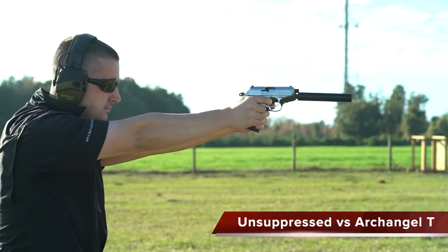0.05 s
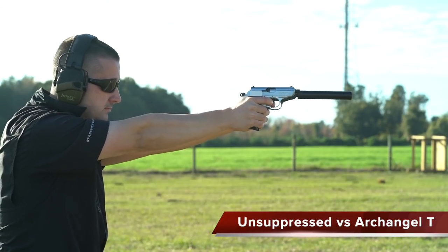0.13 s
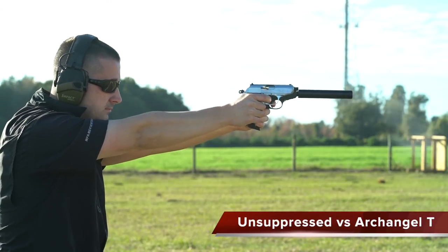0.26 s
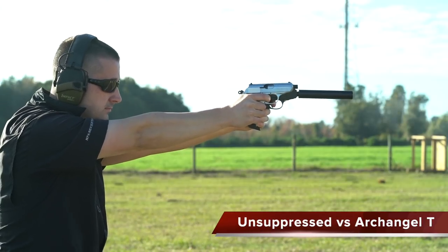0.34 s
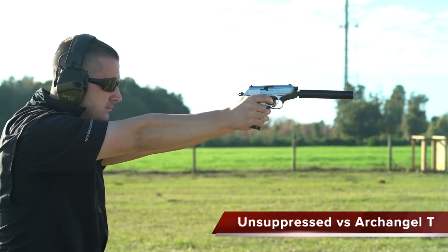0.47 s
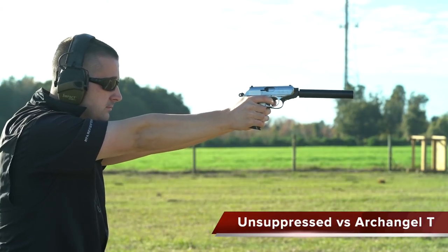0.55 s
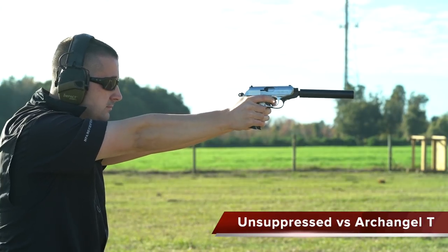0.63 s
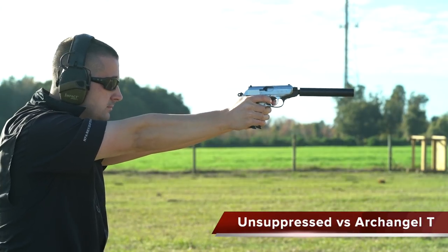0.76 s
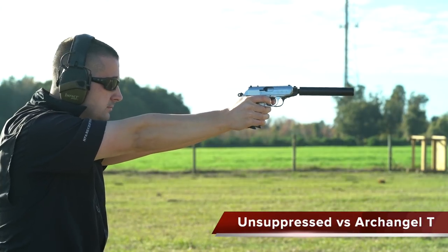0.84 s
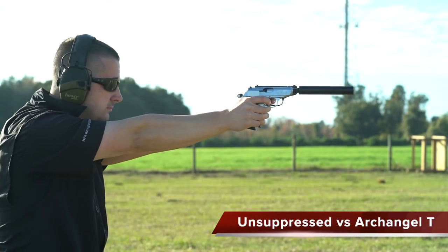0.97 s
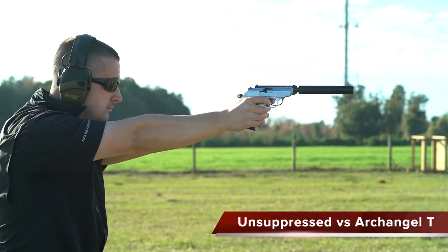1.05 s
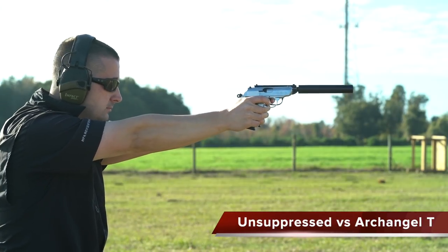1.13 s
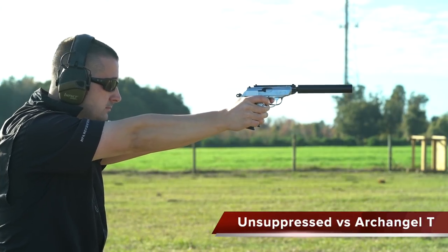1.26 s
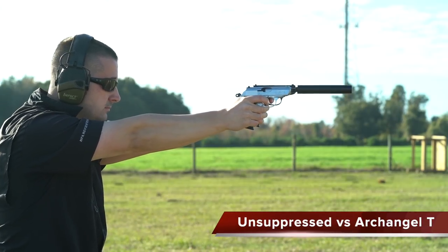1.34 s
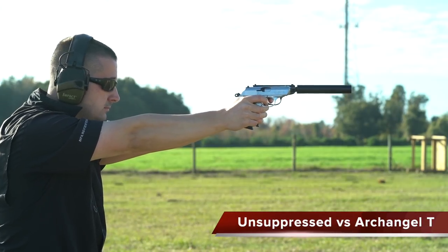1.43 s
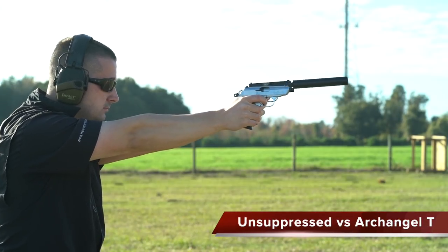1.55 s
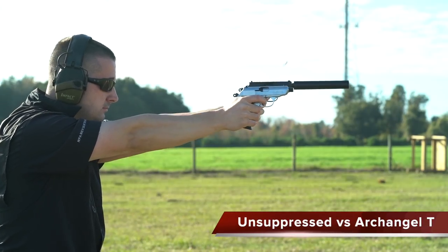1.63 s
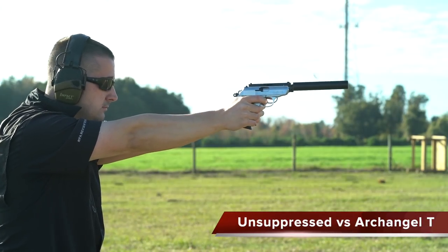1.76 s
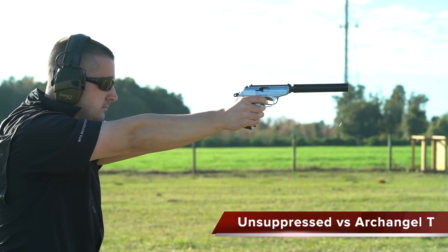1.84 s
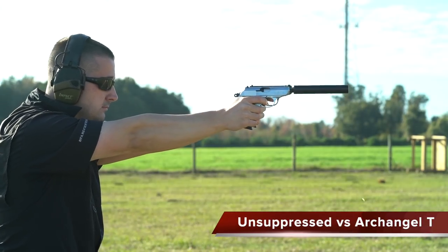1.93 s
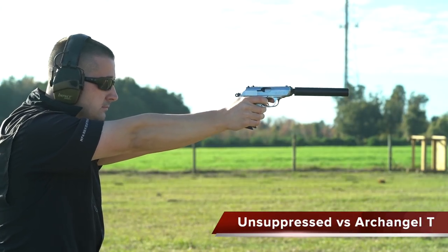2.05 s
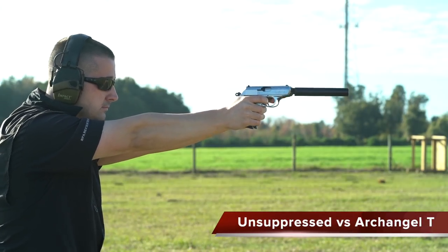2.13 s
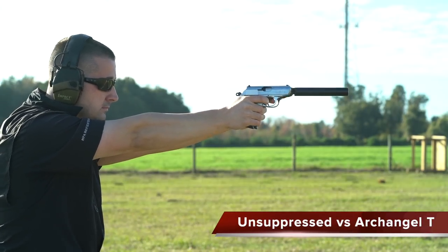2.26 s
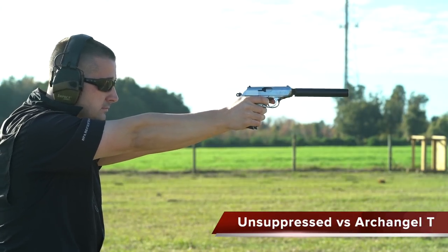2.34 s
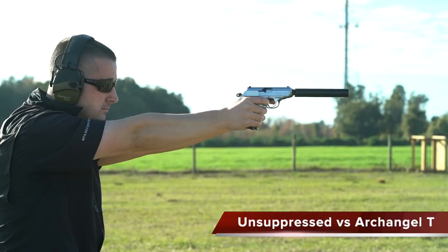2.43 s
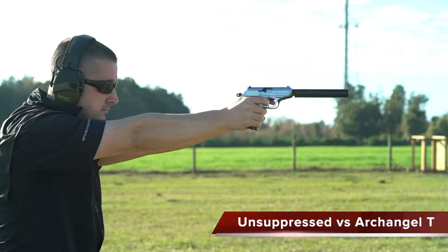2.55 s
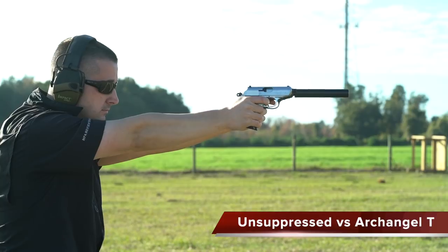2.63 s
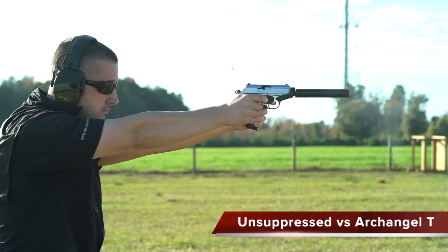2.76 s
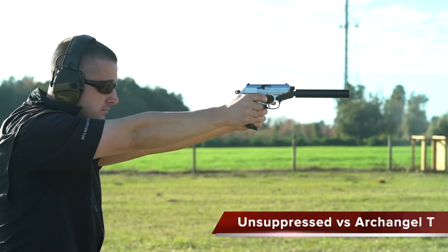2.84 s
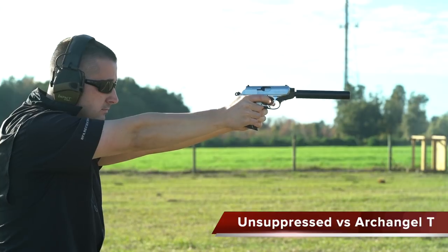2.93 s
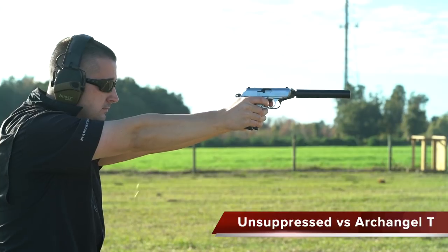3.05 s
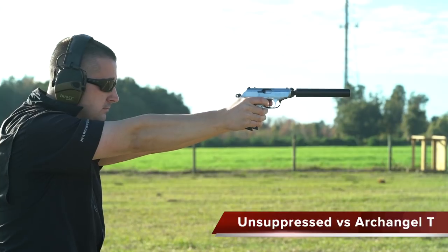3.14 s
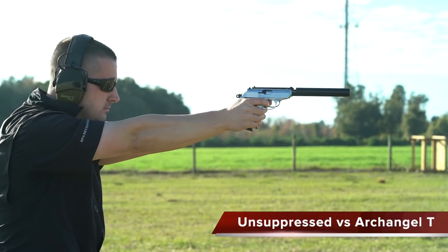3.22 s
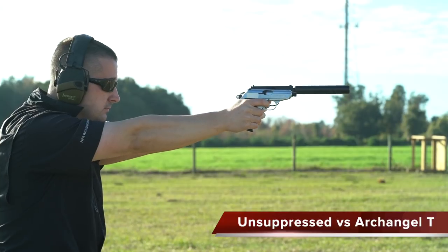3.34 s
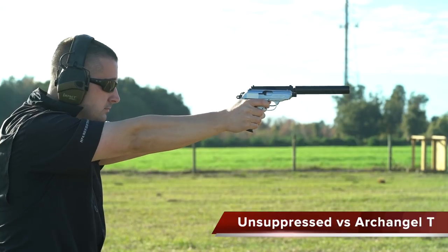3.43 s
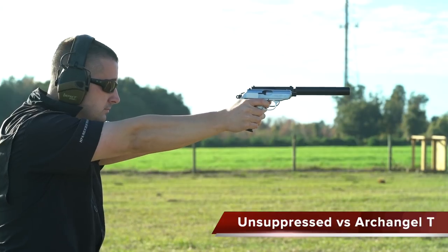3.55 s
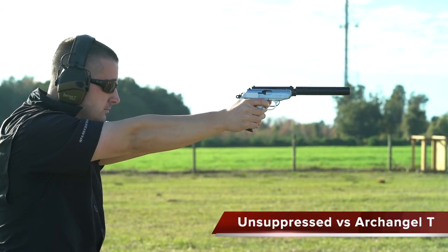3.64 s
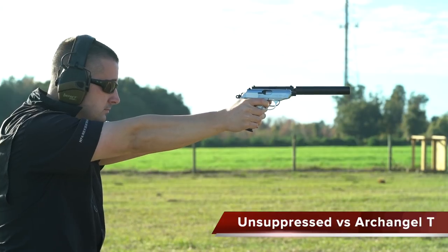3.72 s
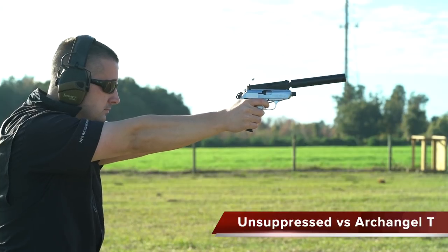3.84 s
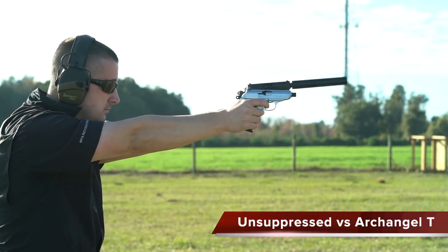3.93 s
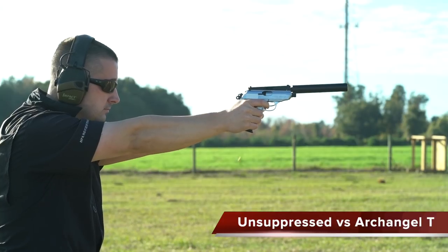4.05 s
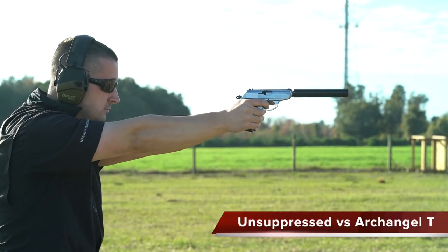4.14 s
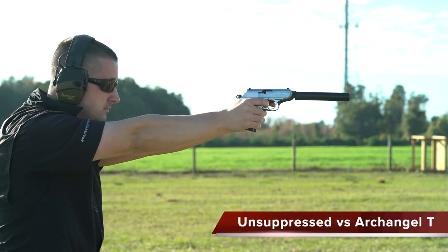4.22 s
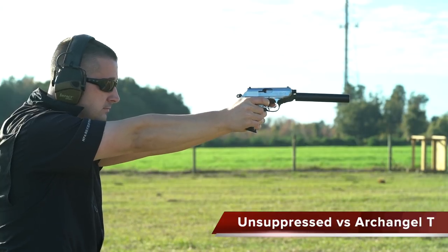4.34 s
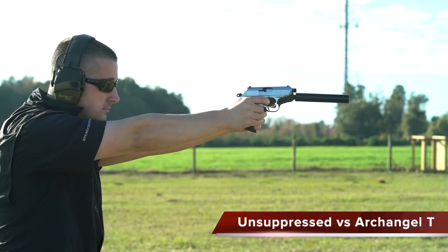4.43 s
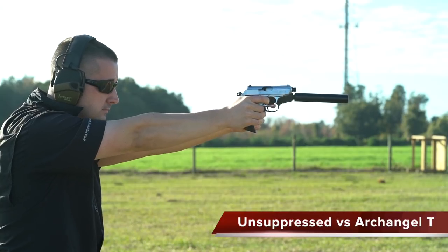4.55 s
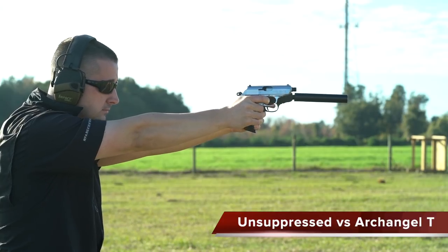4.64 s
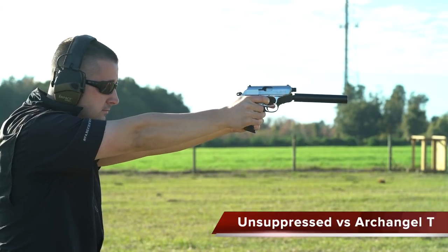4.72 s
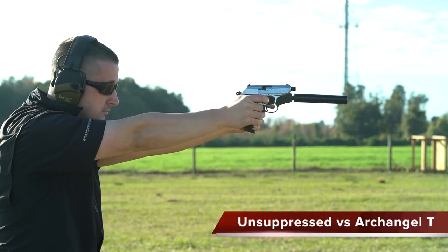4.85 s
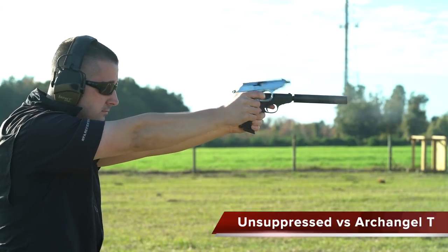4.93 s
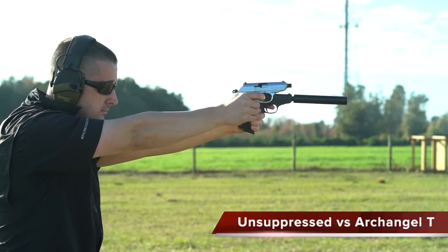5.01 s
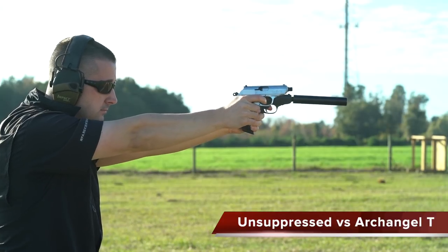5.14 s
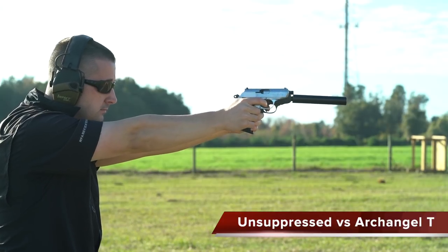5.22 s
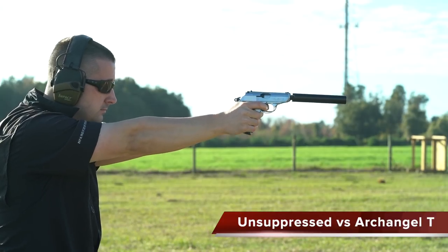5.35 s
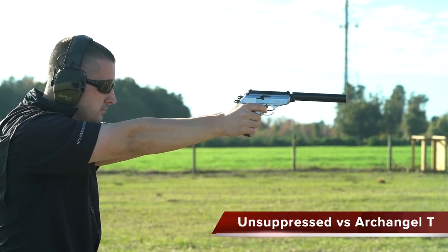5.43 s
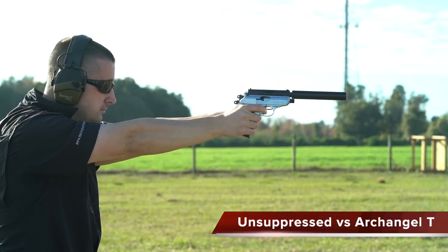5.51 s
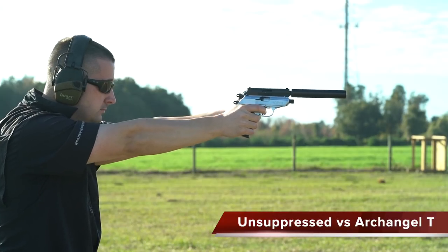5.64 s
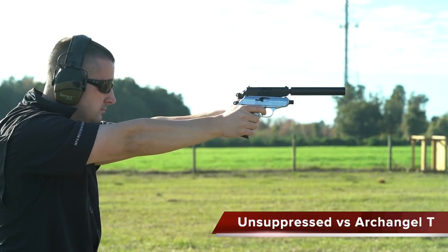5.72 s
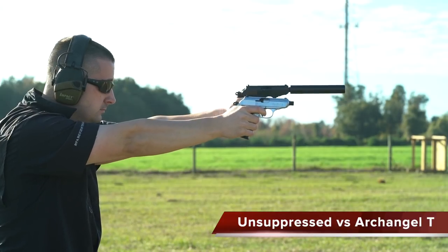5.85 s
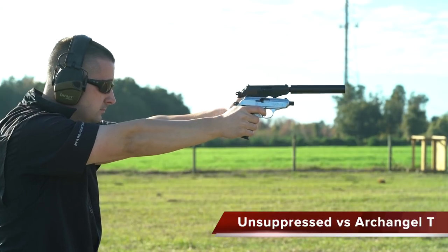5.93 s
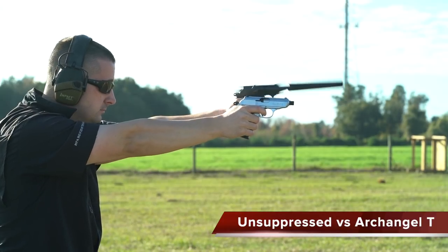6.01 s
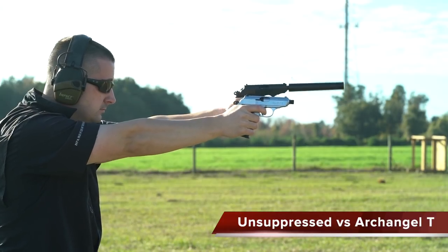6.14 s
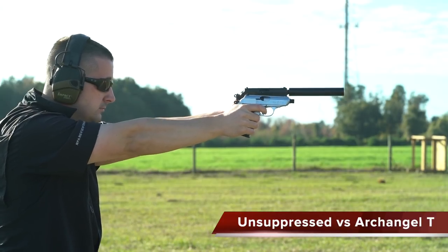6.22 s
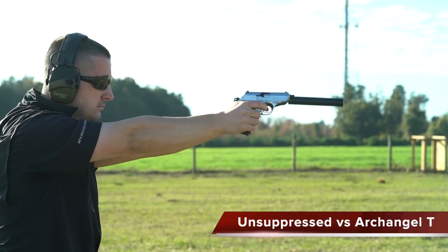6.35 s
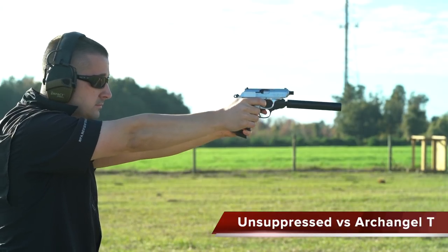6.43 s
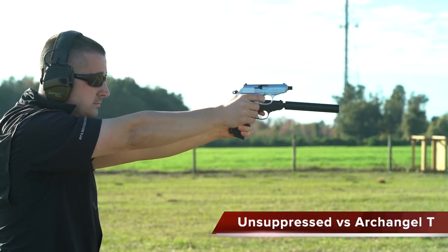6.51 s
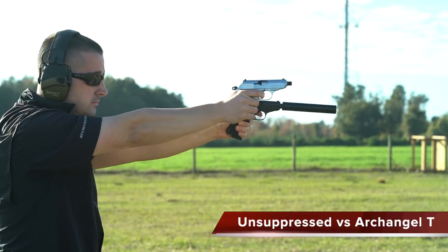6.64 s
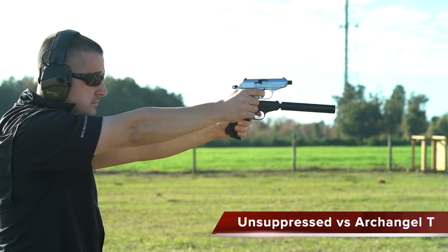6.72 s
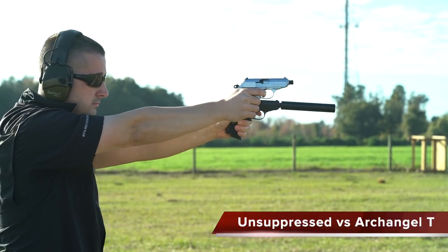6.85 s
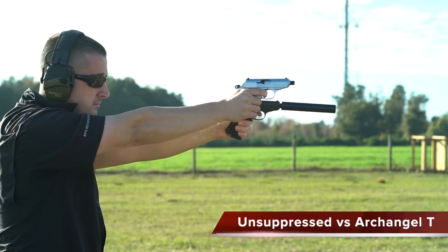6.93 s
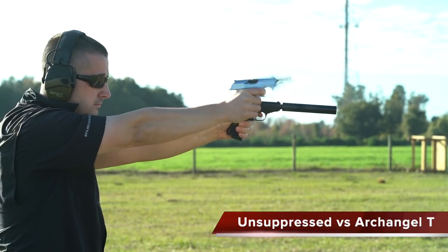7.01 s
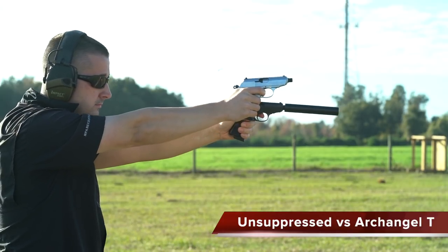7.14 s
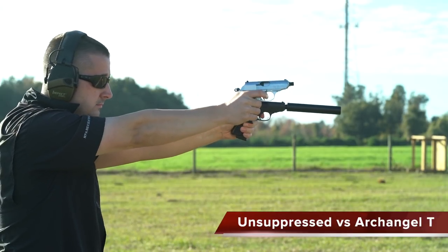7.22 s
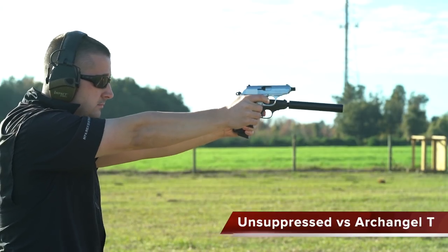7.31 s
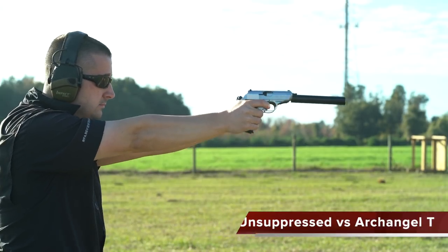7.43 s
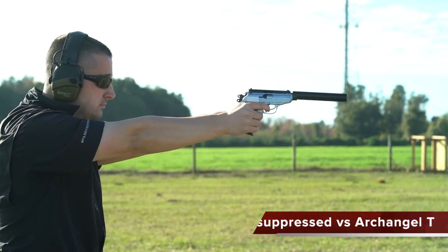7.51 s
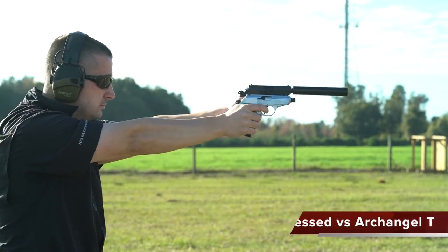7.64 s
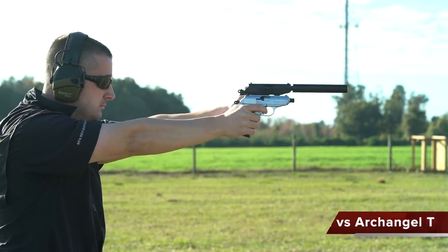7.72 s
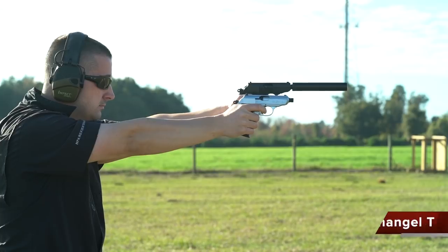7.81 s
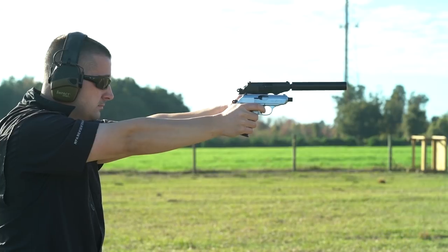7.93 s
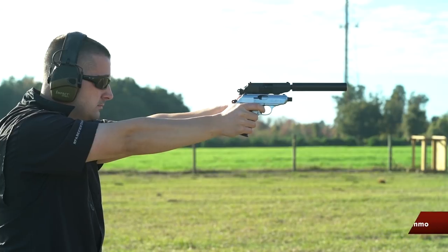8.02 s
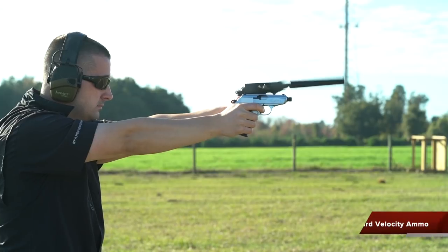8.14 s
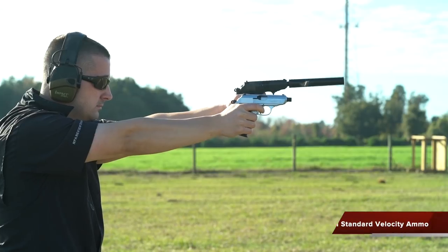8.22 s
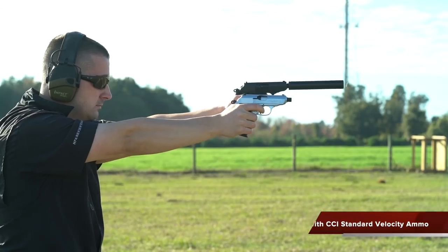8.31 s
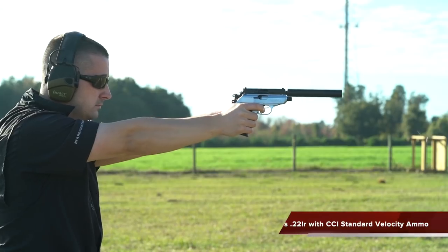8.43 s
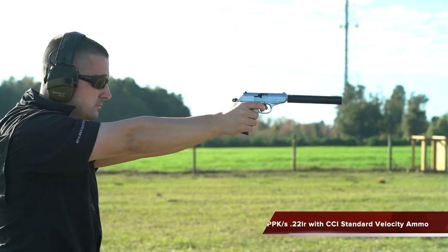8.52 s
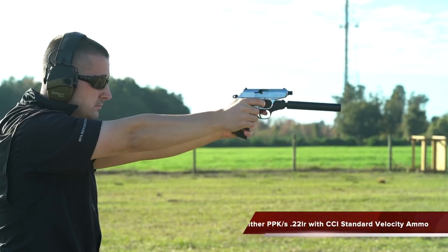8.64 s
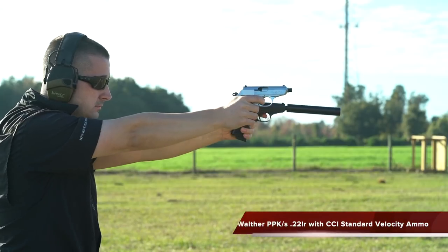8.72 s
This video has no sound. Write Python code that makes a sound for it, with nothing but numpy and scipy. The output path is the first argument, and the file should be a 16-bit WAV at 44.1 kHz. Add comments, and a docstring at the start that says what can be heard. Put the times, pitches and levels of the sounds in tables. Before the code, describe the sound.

Heard close up outdoors, a loud, slightly distorted pistol crack alternates with a quieter, puffing snap from a silenced pistol, four times each at a steady pace. Every shot carries a quick metallic clack and a short slapping echo off the surroundings, strongest after the loud ones. The silenced shots trail a thin, high bullet whir ending in a small distant tick. A very faint road hum lies underneath.

```python
"""Bare and silenced pistols on a grass range

Two small pistols fire in turn: the bare one's blast overloads the microphones, the silenced one cracks,
hisses and thumps, and a steel slide slams shut after each shot. Every shot returns from the same shelter,
bank, fence posts and far tree lines. After the quiet shots the bullet whirs away until it strikes.
Far traffic hums on the left."""
import sys
import numpy as np
from scipy import signal
from scipy.io import wavfile

SR = 44100
rng = np.random.default_rng(int(sys.argv[2]) if len(sys.argv) > 2 else 0)


def wav_record(signal):
    """Record a signal, one row per channel, as 16-bit PCM in the file named by sys.argv[1]."""
    frames = np.transpose(np.atleast_2d(signal))
    bounded = np.clip(frames, -1, 1)
    # unit amplitude maps onto the largest positive 16-bit level
    quanta = np.round(bounded * 32767).astype(np.int16)
    wavfile.write(sys.argv[1], SR, quanta)


N = 386757

# Silenced shots: start_s, crack_db, gas_db, thump_db, echo_db, echo_treble_db, late_ticks_db
SILENCED_SHOTS = [(1.5994, -5.5, -8, 3, -19.5, -7.5, -57), (3.8734, 4, -13.5, -7, -33.5, -11.5, -70),
                  (6.0923, -11.5, -13.5, -7.5, -33.5, -16, -65), (8.2152, -2, -11, -11.5, -31, -19, -60)]
# Spectrum of turbulent powder gas: frequency_hz, density_db
GAS_SPECTRUM = [(180, -27.5), (300, 0.5), (565, -4), (856, -8.5), (2360, -9.5), (6520, -3), (10000, -7.5),
                (14000, -10.5), (16000, -15)]
GROUND_ECHO_S = .0037   # lag of the ground reflection of gas puff and slide
ECHO_SAMPLES = round(1.5 * SR)


def blast():
    """Blast wave: a pressure step swings to suction and back as it dies."""
    swing_hz, decay_s = 900, .0008
    t = np.arange(400) / SR
    return np.cos(2 * np.pi * swing_hz * t) * np.exp(-t / decay_s)


def bare_shots(near, far):
    """Sudden expansion: a blast and its ground reflection, a gas jet, a low thud and the echoes."""
    # start_s, level_db
    shots = [(0.2884, 0.5), (2.786, 1), (4.9794, 0.5), (7.1006, 0.5)]
    # Damped modes of the low thud: pitch_hz, level_db, t60_s
    thud_modes = [(65, -12, 0.035), (273, -5, 0.021), (595, -8.5, 0.047), (812, -6, 0.035)]
    out, t = np.zeros((2, N)), np.arange(3000) / SR
    pulse = from_db(12) * blast()
    ground = from_db(-3.5) * pulse
    thud = ring(thud_modes, spread_db=0, size=20000)
    for start_s, level_db in shots:
        jet = decay(t, 2, t60_s=.0096) * band_noise(GAS_SPECTRUM, [(300, 1), (15000, 1)], len(t))
        arrivals = (0, pulse), (.0036, ground), (.0008, jet), (.001, thud), (0, near), (0, far)
        for delay_s, sound in arrivals:
            add(out, start_s + delay_s, from_db(level_db) * sound)
    return out


def silenced_shots(far):
    """Cavity resonance: the silencer tube thumps after a crack, amid hissing gas; the echo is bright."""
    # pitch_hz, level_db, t60_s
    tube_modes = [(266.7, -18.5, 0.025), (545, -6, 0.0078), (1122, -9.5, 0.0038)]
    out, t = np.zeros((2, N)), np.arange(9000) / SR
    far_treble = butter(far, 6000, "high", order=4)
    crack_s = .00007
    crack = butter((1 - t / crack_s) * np.exp(-t / crack_s), 300, "high")
    for start_s, crack_db, gas_db, thump_db, echo_db, treble_db, _ in SILENCED_SHOTS:
        turbulence = band_noise(GAS_SPECTRUM, [(300, 1), (15000, .49)], len(t))
        add(out, start_s, from_db(gas_db) * gas_flow(t) * turbulence)
        add(out, start_s, from_db(crack_db) * crack)
        thump = from_db(thump_db) * butter(ring(tube_modes, spread_db=1.7), 130, "high")
        add(out, start_s + .00081, thump)
        add(out, start_s + .00068 + GROUND_ECHO_S, from_db(-5) * thump)
        add(out, start_s, from_db(echo_db) * far + from_db(treble_db) * far_treble)
    return out


def gas_flow(t):
    """Pressure release at muzzle and breech: a puff, its ground reflection and a leak in two stages."""
    def puff(age_s, rise_s=.0011):
        return np.clip(age_s / rise_s, 0, 1) * decay(np.abs(age_s), 2, t60_s=.0098)
    leak = decay(t, -6, t60_s=.06) + decay(t, -33, t60_s=.18)
    return puff(t) + from_db(-5.5) * puff(t - GROUND_ECHO_S) + leak


def slide():
    """Impact of steel on steel: short-lived modes ring and small parts rattle as the slide shuts."""
    # start_s, level_db
    closings = [(0.3431, -20.5), (1.6396, -21.5), (2.8293, -23), (3.907, -22), (5.028, -21),
                (6.1267, -18.5), (7.1438, -21), (8.2475, -20)]
    # pitch_hz, level_db, t60_s
    steel_modes = [(2000, -5.5, 0.018), (2120, -4.5, 0.022), (3300, -5.5, 0.015), (4700, -2, 0.016),
                   (6000, -3.5, 0.011), (7260, 0.5, 0.014), (11700, -9, .01)]
    out, t = np.zeros((2, N)), np.arange(6000) / SR
    for start_s, level_db in closings:
        rattle = decay(t, -.5, t60_s=.022) * butter(rng.standard_normal(len(t)), 3000, "high")
        steel = from_db(-7) * butter(ring(steel_modes, spread_db=2.1), 1200, "high")
        clack = from_db(level_db) * (rattle + steel)
        add(out, start_s, clack)
        add(out, start_s + GROUND_ECHO_S, from_db(-5) * butter(clack, 2700, "low"))
    return out


def bullets():
    """Modulation: a bullet's wobble swings its whistle and pulses its wake until it strikes with a tick."""
    # strike_s, strike_db, strike_low_hz, strike_high_hz,
    # first_hz, last_hz, swing_hz, first_db, last_db, pitch_top_s, wobble_hz
    flights = [(1.8149, -33.5, 2042, 3158, 12400, 11700, 695, -51, -69, 1.33, 82.7),
               (4.0872, -29, 1240, 3658, 11260, 10830, 909.3, -49.5, -63.5, 4.18, 98),
               (6.303, -31.5, 2680, 4250, 11400, 11200, 1100, -50, -58.5, 6.9, 101.4),
               (8.4279, -30, 2167, 3520, 11150, 10500, 706.3, -49.5, -62.5, 8, 90.6)]
    out, to_right = np.zeros((2, N)), sides(-10.5)
    for (shot_s, *_), (strike_s, strike_db, low_hz, high_hz, *whir) in zip(SILENCED_SHOTS, flights):
        first_hz, last_hz, swing_hz, first_db, last_db, pitch_top_s, wobble_hz = whir
        start_s = shot_s + .033
        t = np.arange(start_s, strike_s, 1 / SR)
        progress = (t - start_s) / (strike_s - start_s)
        wobble = np.cos(2 * np.pi * wobble_hz * (t - pitch_top_s))
        pitch_noise, wake_noise = rng.standard_normal((2, 12000))[:, :len(t)]
        jitter_hz = 1200 * butter(pitch_noise, 700, "low")
        pitch_hz = first_hz + (last_hz - first_hz) * progress + swing_hz * wobble + jitter_hz
        swell = np.clip(1.6 * wobble + .9, .05, 1)   # loud at each pitch top
        whistle = swell * np.sin(2 * np.pi * np.cumsum(pitch_hz) / SR)
        wake = from_db(-4) * butter(wake_noise, [5500, 14000], "band") * (1 + .59 * wobble)
        fade = from_db(first_db + (last_db - first_db) * progress)
        add(out, start_s, fade * to_right * (whistle + wake))
        tick = ring([(low_hz, 0, .004), (high_hz, -1, .004), (8000, -5, .002)], spread_db=1, size=500)
        add(out, strike_s, from_db(strike_db) * to_right * butter(tick, 450, "high"))
    return out


def near_scatter():
    """Diffuse reflection near the firing line: a bare blast leaves a fast decay and a slower, dull one."""
    # Both spectra: frequency_hz, density_db
    fast_spectrum = [(59, -34.5), (100, -3), (266, -12), (910, -1), (1720, -1.5), (2860, -11.5),
                     (3320, -8.5), (3620, -8.5), (8460, -14.5), (16000, -21.5)]
    slow_spectrum = [(35, -45), (60, -14.5), (217, -8), (363, -2), (607, -12), (1200, -15.5), (3190, -35),
                     (14600, -32), (16000, -37)]
    # Left-right likeness: frequency_hz, correlation
    coherence = [(60, 0.44), (380, 0.5), (2380, 0.68), (15000, 0.1)]
    t = np.arange(ECHO_SAMPLES) / SR
    onset = 1 - np.exp(-(t / .0014) ** 2)
    fast = decay(t, -5, t60_s=.11) * sides(.5) * band_noise(fast_spectrum, coherence, len(t))
    slow = decay(t, -35, t60_s=.38) * sides(-1) * band_noise(slow_spectrum, coherence, len(t))
    return onset * (fast + slow)


def far_scatter():
    """Scattering: each broad reflector returns a crackling wash, dulled by air absorption on its way."""
    # Shelter, bank, scrub and tree lines:
    # delay_s, level_db, rise_s, hold_s, t60_s, tilt_db_per_octave, low_cut_hz, pan_db
    reflectors = [(0.172, -37, 0.0057, .018, 0.099, -1.5, 348, -9.5),
                  (.218, -27, .009, .001, .08, 0, 1300, 0), (0.249, -53, 0.01985, .01, .25, -2, 900, -6.5),
                  (0.297, -63.5, .03, .07, .5, 0, 706.1, -0.5),
                  (0.676, -76.5, .02, .025, .07, 2.5, 697, -0.5),
                  (.78, -68, 0.018, .003, .16, -3.5, 700, 0), (0.857, -69.5, .02, .035, 0.14, -3, 895, -2),
                  (.975, -63.5, .04, .06, 1.5, -4.5, 998.6, 1)]
    # frequency_hz, density_db
    spectrum = [(120, -21.5), (400, -14), (607, -8.5), (676, 6), (1900, 0), (2150, -5), (3810, -9),
                (7630, -14), (16000, -35)]
    # Left-right likeness: frequency_hz, correlation
    coherence = [(500, 0.87), (15000, 1)]
    rise_db, crackle_db, air_hz_at_1s = 22, 3, 3900
    out = np.zeros((2, ECHO_SAMPLES))
    for delay_s, level_db, rise_s, hold_s, t60_s, tilt_db, cut_hz, pan_db in reflectors:
        t = np.arange(-2 * rise_s, hold_s + min(t60_s, .6), 1 / SR)
        crackle = butter(rng.standard_normal(len(t)), 300, "low")
        contour_db = rise_db * np.minimum(t, 0) / rise_s - 60 * np.maximum(t - hold_s, 0) / t60_s
        envelope = from_db(level_db + contour_db + crackle_db * crackle / crackle.std())
        wash = band_noise(spectrum, coherence, len(t), tilt_db=tilt_db, cut_hz=cut_hz)
        wash = butter(wash, min(air_hz_at_1s / delay_s, .4 * SR), "low", order=4)
        add(out, delay_s + t[0], envelope * sides(pan_db) * wash)
    return out


def slap_echoes():
    """Discrete reflection: small hard objects return the blast without bass; the air absorbs treble."""
    # delay_s, level_db, pan_db
    reflectors = [(.1659, -40, -1), (.2087, -33, 2), (.2205, -24, 0), (.2262, -30, -1), (.2281, -29, 0),
                  (.2336, -28, -1), (.2619, -48, 1), (.2859, -53, -1), (.2995, -55, 6), (.309, -56, -3),
                  (.344, -51, 3), (.36, -49, 8), (.3784, -57, 5), (.3933, -52, 9), (.7855, -60, -2),
                  (.8827, -62, -2), (.8982, -62, -1), (.9181, -60, -1), (.989, -58, 0)]
    low_cut_hz, air_hz_at_1s = 1000, 3200
    out, edge = np.zeros((2, ECHO_SAMPLES)), np.diff(blast(), prepend=0)
    for delay_s, level_db, pan_db in reflectors:
        slap = butter(edge, [low_cut_hz, min(air_hz_at_1s / delay_s, .4 * SR)], "band")
        add(out, delay_s, from_db(level_db) * sides(pan_db) * slap / np.abs(slap).max())
    return out


def late_ticks():
    """Damped noise bursts: three faint, bright ticks patter from downrange after each silenced shot."""
    delay_s, gap_s = .351, .006
    out, t = np.zeros((2, N)), np.arange(400) / SR
    for shot_s, *_, level_db in SILENCED_SHOTS:
        for k in range(3):
            noise = butter(rng.standard_normal(len(t)), [2200, 8500], "band")
            start_s = shot_s + delay_s + gap_s * k * rng.uniform(.8, 1.3)
            add(out, start_s, decay(t, level_db, t60_s=.015) * noise)
    return out


def traffic():
    """Stationary noise: a far road hums over the microphones' own hiss."""
    # frequency_hz, density_db
    spectrum = [(12, -63), (20, -33), (77, -3.5), (101, 3), (255, -8), (301, -10.5), (459, -11), (660, -11),
                (738, -16), (897, -8), (2140, -37), (6180, -46), (7310, -43), (14700, -39), (16000, -46)]
    # Left-right likeness: frequency_hz, correlation
    coherence = [(60, .85), (550, .62), (2000, .6), (5000, 0)]
    # frequency_hz, pan_db
    balance = [(60, 4.5), (180, 0.5), (550, 9.5), (1650, 3.5), (4970, -2.5), (15000, -4)]
    hum = from_db(-62) * band_noise(spectrum, coherence, N, pan=balance)
    return hum + from_db(-83) * rng.standard_normal((2, N))


def from_db(db):
    """Amplitude ratio of a level."""
    return 10 ** (np.asarray(db) / 20)


def decay(t, level_db, t60_s):
    """Exponential decay: the level falls 60 dB in t60_s."""
    return from_db(level_db - 60 * t / t60_s)


def sides(pan_db):
    """Left and right gains of a level difference; positive is left."""
    return from_db(np.array([[.5], [-.5]]) * pan_db)


def at_hz(points, hz):
    """Interpolation on a log-frequency axis."""
    frequencies, values = np.array(points).T
    return np.interp(np.log(hz), np.log(frequencies), values)


def add(track, start_s, sound):
    """Superposition: a sound joins the track at start_s."""
    i = round(start_s * SR)
    track[..., i:i + sound.shape[-1]] += sound[..., :track.shape[-1] - i]


def ring(modes, spread_db, size=6000):
    """Free vibration: one blow starts damped modes, their levels varied at random by spread_db."""
    t, offsets_db = np.arange(size) / SR, rng.normal(0, spread_db, len(modes))
    return sum(decay(t, db + offset_db, t60_s) * np.sin(2 * np.pi * hz * t)
               for (hz, db, t60_s), offset_db in zip(modes, offsets_db))


def butter(x, hz, kind, order=2):
    """Causal filter with a flat passband."""
    return signal.sosfilt(signal.butter(order, hz, kind, fs=SR, output="sos"), x)


def band_noise(spectrum, coherence, size, pan=((20, 0), (20000, 0)), tilt_db=0, cut_hz=1):
    """Partly coherent stereo noise in half octaves, rms 1 before pan, tilt about 2 kHz and low cut."""
    out, power, edges = 0, 0, 22 * 2 ** np.arange(0, 10, .5)
    white = rng.standard_normal((2, 2, size + 4000))
    for k, (low, high) in enumerate(zip(edges, edges[1:])):
        mid, side = butter(white[k % 2], [low, min(high, .45 * SR)], "band")[:, 4000:]
        hz = np.sqrt(low * high)
        correlation = np.clip(at_hz(coherence, hz), -1, 1)
        pair = np.sqrt(.5 + correlation / 2) * mid + np.sqrt(.5 - correlation / 2) * side * [[1], [-1]]
        gain = from_db(at_hz(spectrum, hz))
        shape = from_db(tilt_db * np.log2(hz / 2000)) / (1 + (cut_hz / hz) ** 4)
        out = out + gain * shape * sides(at_hz(pan, hz)) * pair
        power += gain ** 2 * np.mean(mid ** 2)
    return out / np.sqrt(power)


def scene():
    """Superposition of shots, echoes, mechanism, bullets and background."""
    near = near_scatter()
    far = far_scatter() + slap_echoes()
    return bare_shots(near, far) + silenced_shots(far) + slide() + bullets() + late_ticks() + traffic()


def record(dry):
    """Overload: the input clips, lopsided peaks leave a slow swing in the low cut, and the top is cut."""
    clipped = np.clip(dry, -1, 1)
    settled = butter(clipped, 6.5, "high", order=3)
    return signal.sosfilt(signal.cheby2(12, 60, 16500, fs=SR, output="sos"), settled)


dry = scene()
out = record(dry)
wav_record(out)
```